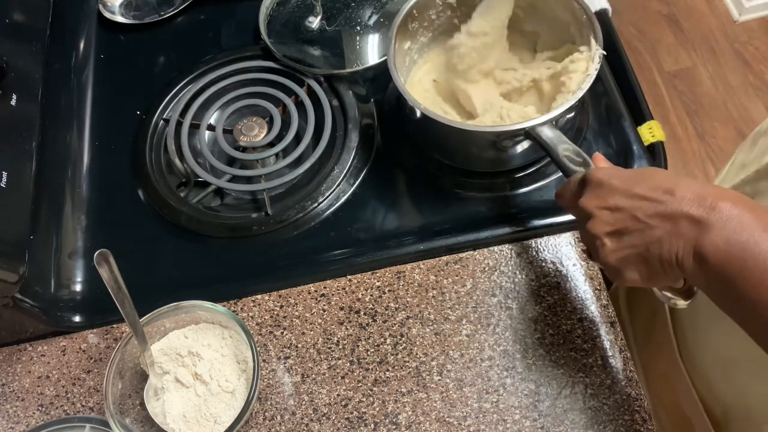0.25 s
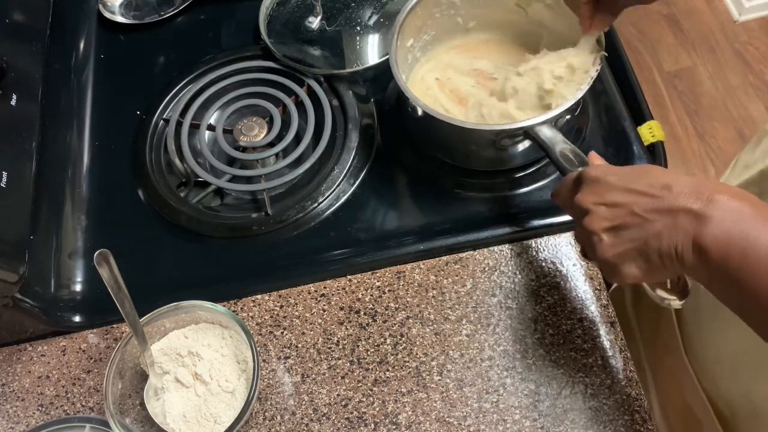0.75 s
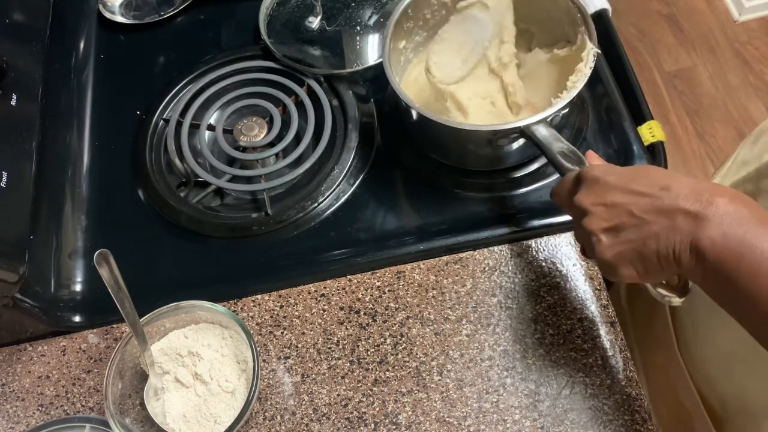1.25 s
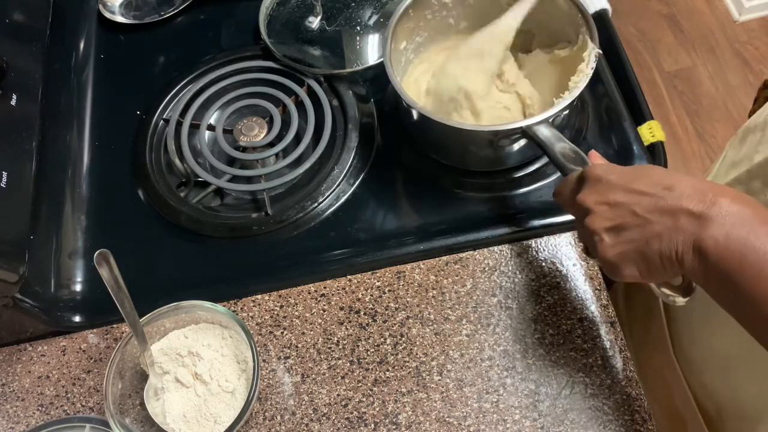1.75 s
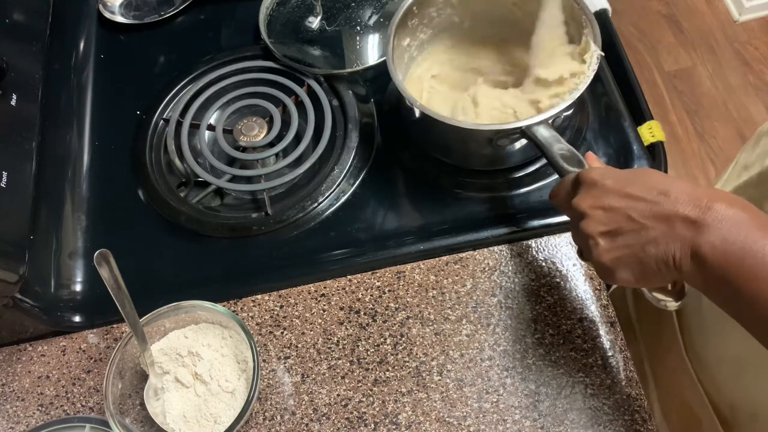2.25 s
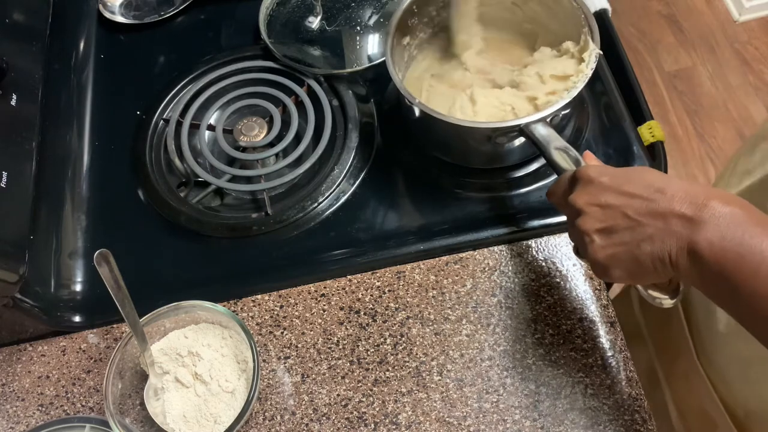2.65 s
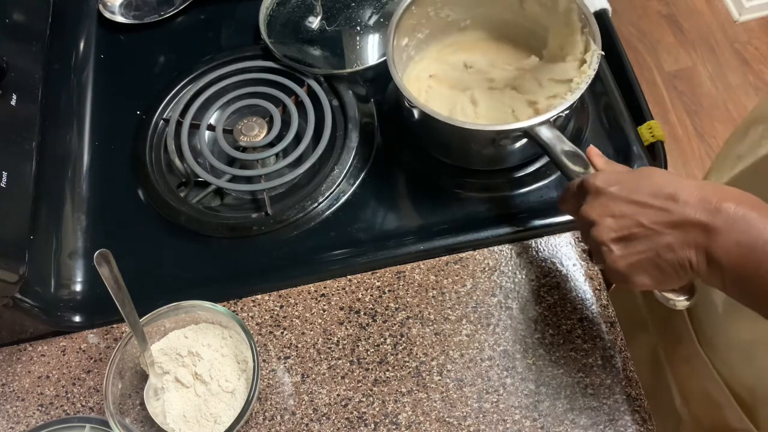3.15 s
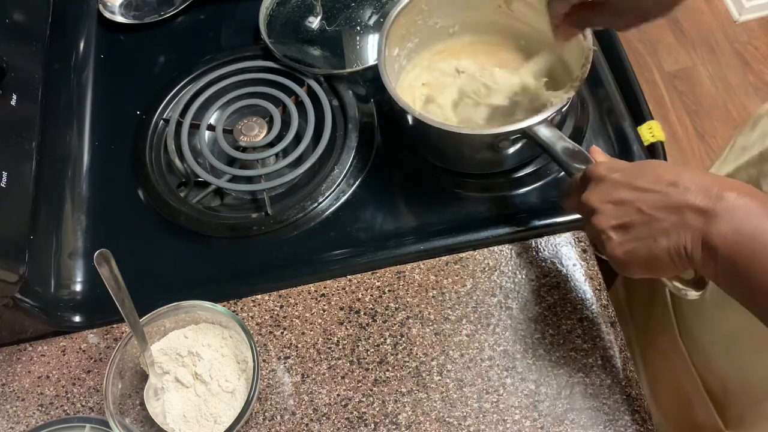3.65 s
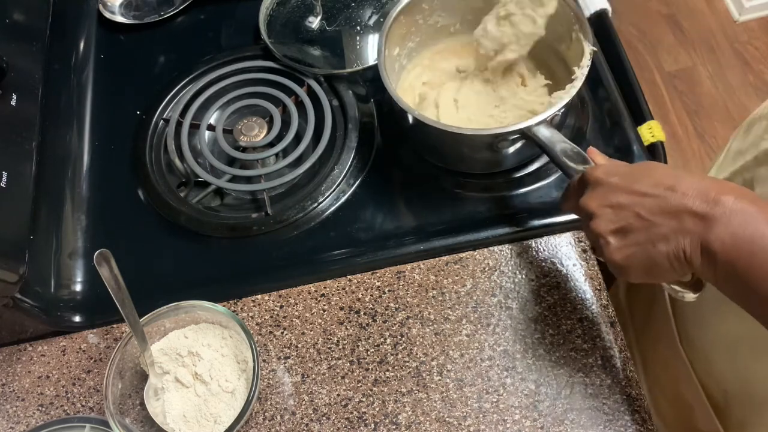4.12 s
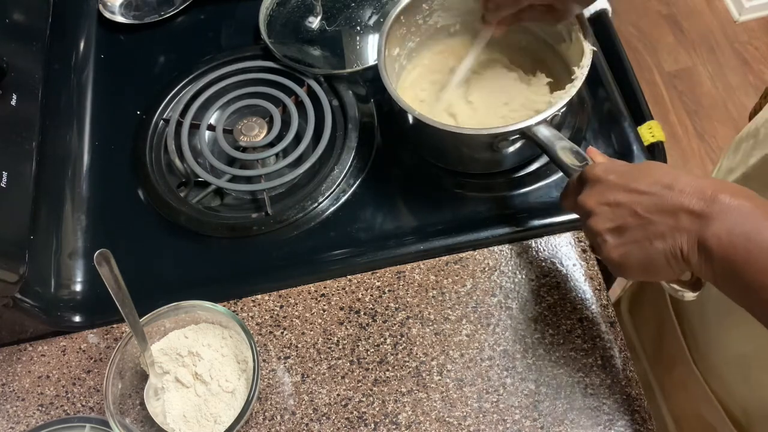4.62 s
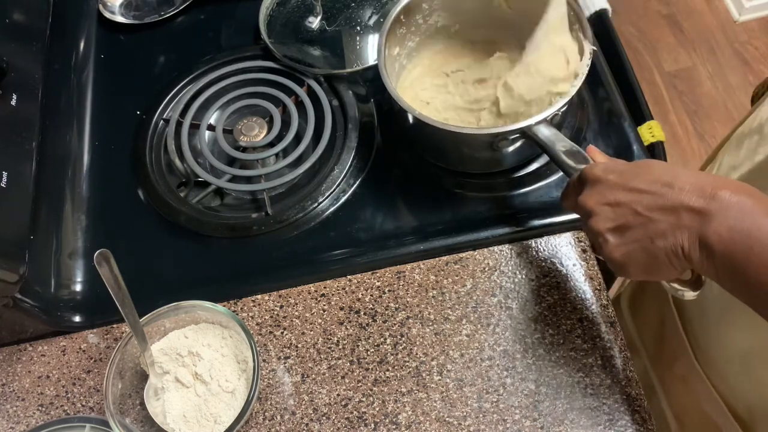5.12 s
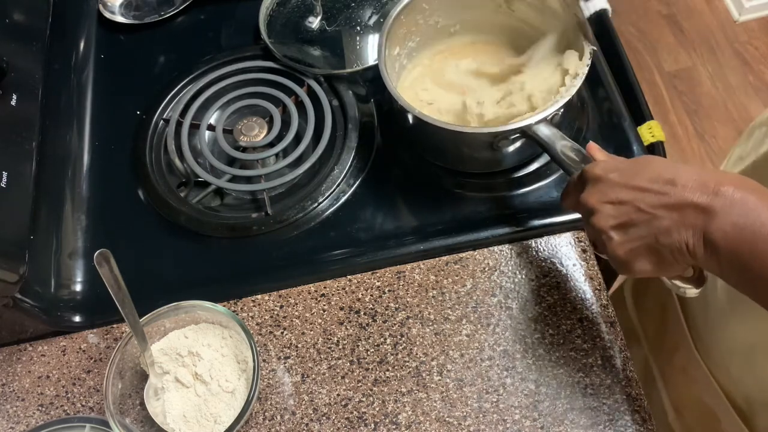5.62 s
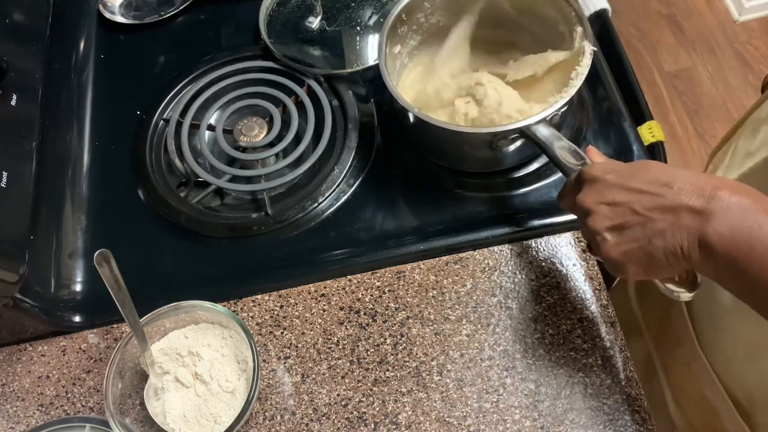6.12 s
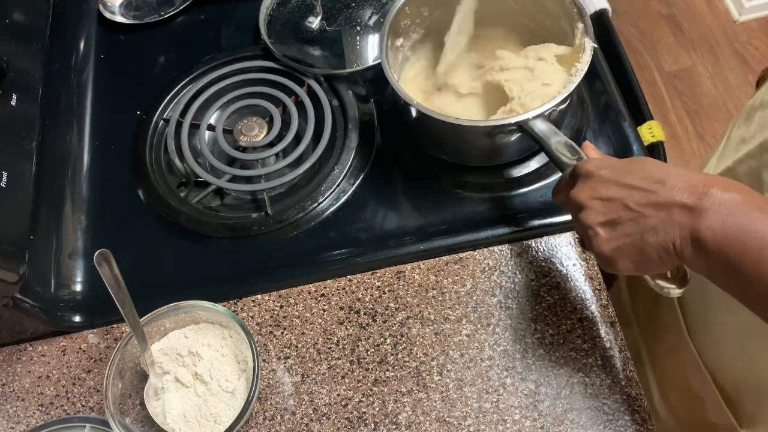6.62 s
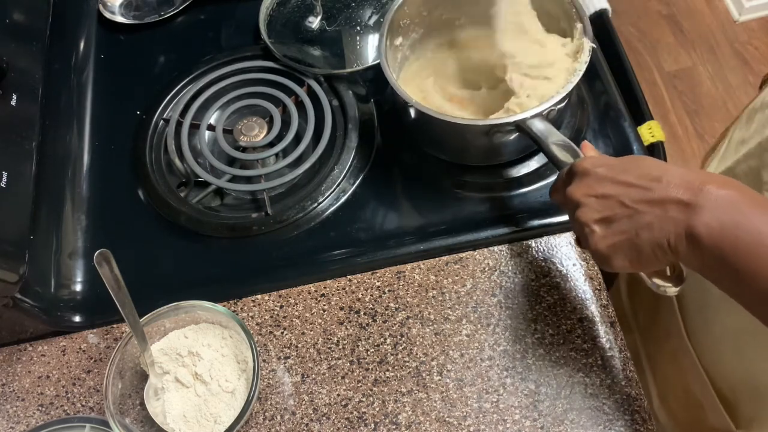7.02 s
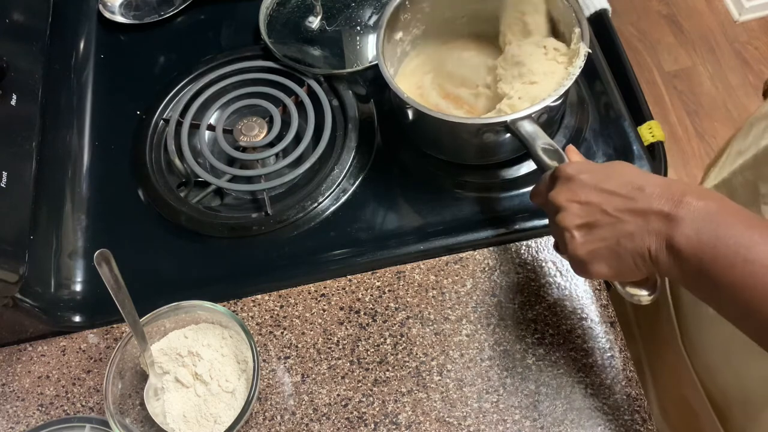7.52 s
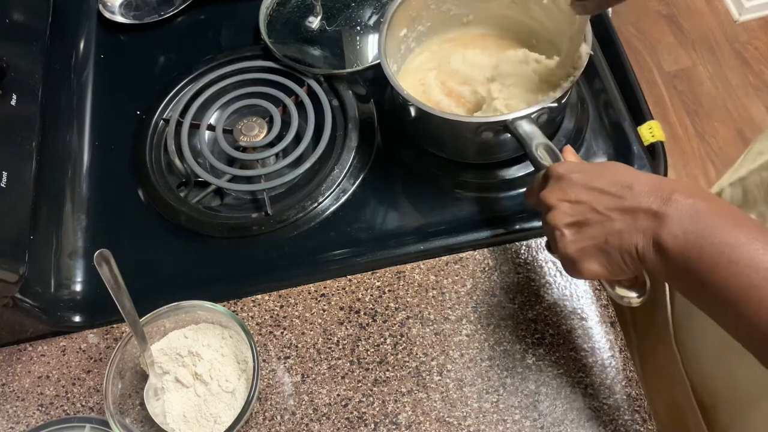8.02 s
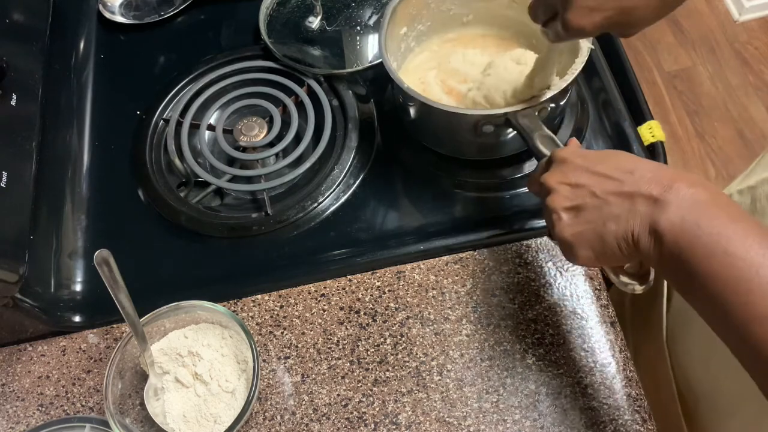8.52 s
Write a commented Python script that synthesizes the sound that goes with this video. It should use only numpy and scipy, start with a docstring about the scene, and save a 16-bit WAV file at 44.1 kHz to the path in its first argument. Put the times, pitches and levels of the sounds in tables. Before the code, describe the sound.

In a small kitchen with a faint low appliance hum, a spoon pushes thick dough round a steel saucepan. Short uneven scrapes mix with sticky crackle and wet smacks, while the pan shifts and thumps on the stove. An early hollow pop, a double knock a little after two seconds and the hardest clanks around six seconds stand out; later stirring is softer. Close stereo microphones with light room echo.

```python
"""Stirring thick dough

A spoon stirs and folds thick dough in a steel saucepan on the coil of an electric stove, heard by two microphones.
Knocks, scrapes and rasps drive the pan's modes and noise washes, and the rubbed pan sings in wavering sines;
dough crackles, smacks and bursts in random snaps and short hollow rings; the pan shifts and groans on the stove top.
A small kitchen echoes it in shaped noise, over a low hum of filtered noise."""
import sys
import numpy as np
from scipy import signal
from scipy.fft import rfft, irfft
from scipy.io import wavfile

SR = 44100
rng = np.random.default_rng(int(sys.argv[2]) if len(sys.argv) > 2 else 0)


def master(y):
    """Save y as 16-bit WAV."""
    cut = np.clip(np.atleast_2d(y).T, -1, 1)
    pcm = np.round(cut * 32767)  # scale
    wavfile.write(sys.argv[1], SR, pcm.astype(np.int16))


N = 386316

# Levels in the tables are relative; the sources trim some of them further.
# pushes of the spoon through the dough: start_s, length_s, scrape level_db, sticky dough level_db, pan shift level_db
STROKES = [(-.02, 0.022, -43.5, -43, -39.5), (0.237, 0.09, -48.5, -46, -43), (0.413, 0.17, -51, -47.5, -50),
           (0.749, 0.03, -39.5, -42, -38.5), (0.93, 0.056, -53, -63, -49), (1.072, 0.18, -80, -62.5, -61),
           (1.332, 0.095, -55, -58, -51.5), (1.51, 0.26, -51.5, -49, -48), (2.015, 0.35, -55, -54.5, -51),
           (2.465, 0.18, -50, -54, -49), (2.603, 0.19, -43.5, -42, -42), (2.886, 0.15, -54, -49.5, -50.5),
           (3.19, 0.06, -51, -48.5, -48), (3.299, 0.17, -43.5, -45.5, -41), (3.64, 0.055, -55, -52.5, -51),
           (3.803, 0.028, -54, -62, -48), (3.94, 0.034, -58.5, -55.5, -75), (4.388, 0.13, -53.5, -61, -53),
           (4.61, 0.13, -59.5, -60.5, -48.5), (5.059, 0.018, -65, -63.5, -46.5),
           (5.388, 0.087, -56, -46.5, -43.5), (5.507, 0.16, -58, -43.5, -54),
           (6.04, 0.19, -51.5, -54, -42.5), (6.303, 0.015, -39, -40, -47), (6.388, 0.03, -49, -48.5, -58),
           (6.7, 0.06, -50, -45, -51), (6.833, 0.092, -51.5, -48.5, -51), (7.059, 0.035, -52, -46, -48),
           (7.235, 0.016, -47, -49.5, -42.5), (7.35, 0.13, -47, -48, -44), (7.571, 0.13, -52, -51, -47),
           (7.8, 0.18, -58.5, -57.5, -48), (8.132, 0.06, -48.5, -53.5, -49),
           (8.215, 0.038, -56, -54.5, -54), (8.322, 0.64, -58, -59, -51), (8.715, .06, -56, -47.5, -46.5)]
# dough peeling off as the spoon lifts: start_s, length_s, level_db
PEELS = [(1.18, 0.026, -61), (1.604, 0.33, -63.5), (2.624, 0.011, -37.5), (4.21, 0.022, -58),
         (4.346, .01, -54), (4.5, 0.0081, -51.5), (7.69, 0.016, -52)]
# spoon against pan: start_s, wall level_db, stove thump level_db, base level_db, tick level_db
KNOCKS = [(0.227, -35.5, -45, -91, -63), (0.7129, -42.5, -62, -44.5, -67), (0.7791, -30.5, -43.5, -57, -69),
          (0.8952, -37.5, -52.5, -69, -53), (1.4352, -43, -64, -61, -66), (1.528, -65, -45, -34, -58),
          (1.541, -28.5, -46, -35, -50.5), (2.169, -31, -39.5, -49, -46),
          (2.2264, -21.5, -39.5, -63, -36.5), (2.2323, -20.5, -41, -50, -44), (2.334, -50, -52, -50, -56),
          (2.4584, -24.5, -43, -45, -40.5), (3.327, -32.5, -51.5, -46, -69),
          (4.3312, -41.5, -53.5, -71, -62), (5.3167, -41.5, -50, -43.5, -57),
          (5.3629, -40.5, -71, -48, -51), (5.6686, -36, -49, -54, -74), (5.7719, -36.5, -47, -34.5, -54),
          (5.9968, -25, -36.5, -26, -36.5), (6.5447, -16, -30, -23.5, -29.5), (6.633, -49, -65, -48, -58),
          (6.6885, -48, -46.5, -55, -64), (6.7925, -34, -49.5, -50, -53), (7.2227, -36.5, -48.5, -35, -60),
          (7.3232, -42, -62, -40, -61), (8.1356, -43, -57, -39.5, -74)]
# dough tearing off the spoon, but at 0.8943 s the sharp click of the spoon on the pan:
# start_s, level_db, length_s, ring pitch_hz
SNAP_RUNS = [(0.446, -53, .02, 890), (0.46, -52, 0.033, 990), (0.528, -55, 0.023, 610),
             (0.619, -56.5, 0.016, 580), (0.731, -55, 0.034, 520), (0.764, -46, 0.036, 915),
             (0.8943, -50, 0.00217, 3700), (1.731, -55, 0.026, 1090), (2.59, -62, 0.018, 1110),
             (2.662, -47, 0.013, 630), (2.684, -47, 0.017, 1115), (2.782, -63, .015, 1470),
             (3.256, -52.5, 0.035, 706), (3.392, -54, 0.016, 1160), (3.476, -55, 0.016, 1220),
             (3.51, -53.5, 0.016, 1100), (3.644, -62, 0.03, 1290), (3.698, -56.5, 0.019, 1120),
             (3.798, -57, 0.013, 1140), (4.283, -58.5, 0.029, 1110), (4.449, -62.5, 0.021, 1130),
             (5.396, -59, 0.016, 1220), (5.439, -51.5, 0.024, 644), (5.535, -57.5, .035, 655),
             (5.633, -58, .025, 1140), (7.432, -57, 0.017, 1210), (7.614, -56, 0.038, 1360),
             (7.977, -63.5, 0.017, 1090)]
# air pockets bursting in the dough: start_s, level_db, pitch_hz, t60_s
POCKETS = [(.7655, -22, 667, 0.051), (4.744, -50.5, 583, 0.025), (5.045, -40, 623, 0.037),
           (5.773, -50, 830, 0.036), (7.256, -42, 746, 0.016), (8.271, -39.5, 604, 0.023),
           (8.547, -49, 620, 0.024), (8.735, -37, 540, 0.015)]
# first the bright edge of the spoon's tick on the pan, then rasps of the spoon on bare steel:
# start_s, length_s, level_db, note of the wall at that spot pitch_hz
BRIGHT_RUBS = [(0.892, .025, -57, 5600), (2.63, 0.029, -55, 3580), (2.707, .08, -62, 4420),
               (3.438, 0.071, -64.5, 4170), (3.641, 0.017, -60.5, 3250), (5.54, 0.041, -60, 2250),
               (6.288, 0.036, -43.5, 3090), (6.38, 0.029, -71, 2200), (6.64, 0.11, -63, 4290),
               (7.33, 0.14, -75, 3600)]
# pan groaning as it is dragged across its coil: time_s, level_db, pitch_hz
GROAN = [(2.50, -70, 155.8), (2.56, -53, 150.4), (2.63, -46.5, 159.6), (2.721, -47, 140.2),
         (2.81, -47, 132), (2.86, -71, 129)]
# sustained notes of the rubbed pan, a low groan of its base, then a thin rim note:
# start_s, length_s, level_db, pitch_hz
RUBBED_NOTES = [(6.175, .065, -55, 670), (6.86, .085, -60.5, 2062)]

# modes of the air in the pan and its dough-damped wall: pitch_hz, level_db, t60_s
PAN_MODES = [(1082, 7, .17), (1145, -2, .1), (1295, -4, .14), (1347, -5, .19), (1545, -9, .09),
             (2062, -4, .19), (2175, -6, .13), (2347, -7, .09), (2750, -7, .05), (3086, -4, .14),
             (3250, -4, .07), (3480, -6.5, .06), (4015, -7, .07), (4353, -7, .13)]
# modes of the pan base on its coil: pitch_hz, level_db, t60_s
BASE_MODES = [(622, 5, .17), (801, 3, .19), (913, 0, .17)]
# modes of the sheet-metal stove top: pitch_hz, level_db, t60_s
STOVE_MODES = [(61.6, -8, .55), (130, -4.5, .19), (166, -1, .17), (211, 2.5, .15), (275, -3, .2),
               (374.4, -10, .16), (411, -4.5, .15)]
# modes of the pan wall where it is scraped bare: pitch_hz, level_db, t60_s
BARE_WALL_MODES = [(1098, -9, .05), (2120, -7, .022), (2370, -4, .02), (3060, 2, .018), (3560, -2, .012),
                   (3960, -4, .016), (4600, -5, .01), (5200, -6, .018), (6185, -9, .018), (7600, -6, .01)]

# dull pan under a scrape, noise spectrum: frequency_hz, level_db (per hertz)
PAN_COLOUR = [(200, -15), (420, 9), (620, 12.5), (900, 10), (1130, 12), (1450, 7), (1750, 4.5), (2150, 3.5),
              (2650, 2.5), (3300, 3), (4800, -5), (7000, -9), (15000, -10)]
# knock on the pan wall, noise spectrum: frequency_hz, level_db (per hertz)
KNOCK_COLOUR = [(200, -18), (450, -2), (1080, 1.5), (1650, -5), (2150, -1), (2750, -5), (3400, -3.5),
                (5000, -9), (7000, -15), (15000, -32)]
# pan base, noise spectrum: frequency_hz, level_db (per hertz)
BASE_COLOUR = [(200, -29), (450, -19.5), (620, -5.5), (900, -10), (1300, -18), (3000, -32)]
# bright tick of a knock, noise spectrum: frequency_hz, level_db (per hertz)
TICK_COLOUR = [(1500, -25), (4000, -5), (5500, -3), (7000, -1.5), (8000, 2), (9800, 2), (11500, -2.5),
               (15500, -8)]
# stove top, noise spectrum: frequency_hz, level_db (per hertz)
STOVE_COLOUR = [(35, -18), (60, -16), (95, -11), (130, -1.5), (165, 0), (205, 0), (270, -1.5), (320, -5),
                (400, -2.5), (560, -11), (900, -17), (2000, -60)]
# sticky dough crackle, noise spectrum: frequency_hz, level_db (per hertz)
DOUGH_COLOUR = [(500, -15), (2000, 6.5), (4500, 1), (6700, 0.5), (8500, 8.5), (10500, 7), (13000, 4),
                (15500, -4.5)]
# smacks and the sharp click, noise spectrum: frequency_hz, level_db (per hertz)
SNAP_COLOUR = [(200, -16), (450, -3), (1100, 0), (1800, -5), (2500, -9), (3300, -8), (5000, -17),
               (15000, -28)]
# kitchen hum, noise spectrum: frequency_hz, level_db (per hertz)
HUM_COLOUR = [(20, -11), (35, -7), (62, 3), (95, -2), (125, -1), (205, -.5), (255, -3.5), (380, -5.5),
              (520, -10), (680, -14), (870, -14), (1100, -16.5), (2100, -25.5), (3200, -34), (6000, -41),
              (15500, -54)]
# different paths round the recorder to its two microphones: frequency_hz, left lead phase_rad
PORT_PHASE = [(550, 0), (850, -.4), (1100, .8), (1400, -.4), (2050, -.6), (3100, -5.6), (4000, -6.2),
              (6600, -5.9), (8700, -9.4), (9800, -12.4), (10400, -12.7), (15500, -21)]

# the spoon takes hold (ramp); the dough relaxes (time constant); a push eases as the dough gives way
ATTACK_S, RELEASE_S, SAG_DB_PER_S = 0.089, 0.063, 13.5
STICK_SLIP_DB, STICK_SLIP_HZ = 2.6, 48
# the spoon never quite rests between pushes
IDLE_SCRAPE_DB, IDLE_DOUGH_DB, IDLE_SHIFT_DB = -88, -74, -55.5
RUB_RING_SHARE = .35  # of their ring time, kept by the wall's modes under the rubbing spoon
# sticky clumps part under the moving spoon: rate, spread of their snaps, ring time, pitch range
CLUMPS_PER_S, CLUMP_S, CLUMP_T60_S, CLUMP_LOW_HZ, CLUMP_HIGH_HZ = 48, .009, .009, 500, 4600
CLUMP_DB, CLUMP_SPREAD_DB, CLUMP_DB_PER_OCTAVE = .5, 2.6, -2.6
WALL_RING_DB, BASE_RING_DB = -3, -4  # against the dense wash of a knock
# the pan rocks back onto its coil: delay after the knock, level against the listed stove thump
SETTLE_S, SETTLE_DB = .018, -7.5
HOLLOW_DB, HOLLOW_T60_S = 5.5, 0.013  # short ring of each snap, in a smack the gap between spoon and dough
SPLAT_DB = -8  # tearing wet skin of a pocket, against its tone
RASP_ATTACK_S, RASP_RELEASE_S = 0.03, 0.0079
# squeak level against the wall; wander of its pitch (share) and flutter of its level as the spoon catches
SQUEAK_DB, SQUEAK_WANDER, SQUEAK_FLUTTER_DB = -6.5, .024, 3.5
NOTE_ATTACK_S, NOTE_RELEASE_S = .015, .025  # notes of the rubbed pan
TOP_HZ = 15500


def undb(db):
    """Decibels to gain."""
    return 10 ** (np.asarray(db) / 20)


def unit(x):
    """Scale to rms 1."""
    return x / np.sqrt(np.mean(x ** 2))


def blow(response):
    """Scale a response to rms 1 over its first fiftieth of a second."""
    return response / np.sqrt(np.mean(response[:SR // 50] ** 2))


def fade(t60, size):
    """Exponential decay over size samples, reaching -60 dB after t60 seconds."""
    return np.exp(-np.log(1000) * np.arange(size) / SR / t60)


def colour(x, points):
    """Causal minimum-phase filter through (Hz, dB) points."""
    hz, db = np.transpose(points)
    size = 8192
    f = np.maximum(np.arange(size // 2 + 1) * SR / size, 1)
    gain = undb(np.interp(np.log(f), np.log(hz), db))
    # folding the cepstrum gathers the response at its start
    cepstrum = irfft(np.log(gain))
    cepstrum[1:size // 2] *= 2
    cepstrum[size // 2 + 1:] = 0
    response = irfft(np.exp(rfft(cepstrum)))
    return signal.oaconvolve(x, response)[:len(x)]


def walk(rate):
    """Random drift through rate new points a second, with a spread near 1."""
    points = rng.standard_normal(int(N / SR * rate) + 2)
    return np.sqrt(3 / 2) * np.interp(np.arange(N) / SR * rate, np.arange(len(points)), points)


def add(track, s, sound):
    """Mix a sound into a track at time s."""
    start = max(int(s * SR), 0)
    track[start:start + len(sound)] += sound[:max(N - start, 0)]


def ring(modes, scatter_db, size=SR // 2):
    """Decaying modes; their shares vary as they would with the place of contact."""
    out = np.zeros(size)
    for hz, db, t60 in modes:
        t = np.arange(min(size, int(t60 * SR) + 2)) / SR
        level = undb(db + scatter_db * rng.standard_normal())
        out[:len(t)] += level * fade(t60, len(t)) * np.sin(2 * np.pi * (hz * t + rng.random()))
    return unit(out)


def crack(points, t60, direct, size=SR // 2):
    """A click with a dense wash of overlapping short modes; direct is the click's share."""
    wash = fade(t60, size) * rng.standard_normal(size)
    click = direct * signal.unit_impulse(size)
    return unit(colour(wash / np.linalg.norm(wash) + click, points))


def grains(rate, spread_db):
    """Tiny slips or snaps at random moments, a few much larger than the rest."""
    chance = rng.random((3, N))
    hit = chance[0] < rate / SR
    size = np.minimum(-np.log(1 - chance[1, hit]), 3.5)
    out = np.zeros(N)
    out[hit] = undb(spread_db * size) * np.sign(chance[2, hit] - .5)
    return unit(out)


def pushes(rows, idle_db, attack_s, release_s):
    """Level in dB of a run of (start s, length s, dB) pushes: each takes hold, eases off and relaxes."""
    power = np.full(N, undb(idle_db) ** 2)
    for s, length, db in rows:
        age = np.arange(max(-attack_s, -s), length + 5 * release_s, 1 / SR)
        hold = (1 + age / attack_s).clip(0, 1) ** 2
        relax = np.exp(-np.maximum(age - length, 0) / release_s)
        push = hold * undb(db - SAG_DB_PER_S * age) * relax
        add(power, s - attack_s, push ** 2)
    return 10 * np.log10(power)


def scrape(db):
    """The spoon sticks and slips on the coated steel and parts clumps; the modes it finds change as it travels."""
    slips = unit(grains(rate=420, spread_db=4.5) * undb(4 * np.tanh(walk(60))))
    dull = unit(colour(slips, PAN_COLOUR))
    angle = 1.5 * walk(10)
    damped = [(hz, level_db, t60 * RUB_RING_SHARE) for hz, level_db, t60 in PAN_MODES]
    # two sets of mode shares trade places as the spoon travels
    steel = np.zeros(N)
    for share in (np.cos(angle), np.sin(angle)):
        steel += share * signal.oaconvolve(slips, ring(damped, scatter_db=1.5, size=SR // 8))[:N]
    mix = undb(-1) * dull + undb(-5) * unit(steel) + undb(CLUMP_DB) * clumps()
    return undb(db - 13.0) * mix


def clumps():
    """Each clump lets go in three quick snaps that ring a small hollow, its pitch sliding as it opens or closes."""
    out, t = np.zeros(N), np.arange(SR // 40) / SR
    for when, height, strength, slide, *gaps in rng.random((int(CLUMPS_PER_S * N / SR), 7)):
        hz = CLUMP_LOW_HZ * (CLUMP_HIGH_HZ / CLUMP_LOW_HZ) ** height
        db = CLUMP_SPREAD_DB * min(-np.log(1 - strength), 3)
        db += CLUMP_DB_PER_OCTAVE * np.log2(hz / CLUMP_LOW_HZ)
        for gap in gaps:
            pitch = hz * (1 + .3 * (slide - .4) * (gap + t / CLUMP_S).clip(0, 2))
            tone = np.sin(2 * np.pi * np.cumsum(pitch) / SR)
            snap = undb(db) * (1 - gap / 2) * fade(CLUMP_T60_S, len(t)) * tone
            add(out, when * N / SR + gap * CLUMP_S, snap)
    return unit(out)


def dough(db):
    """Sticky dough peels from spoon and pan in a fine wet crackle with a few larger snaps."""
    fizz = grains(rate=4000, spread_db=2.2) * undb(2.6 * walk(50))
    snaps = grains(rate=70, spread_db=3)
    return undb(db - 9.5) * unit(colour(fizz + undb(-6.5) * snaps, DOUGH_COLOUR))


def shifting(db):
    """The pan is dragged a little on its coil and the stove top rumbles."""
    judder = grains(rate=500, spread_db=1.5)
    sheet = unit(signal.oaconvolve(judder, ring(STOVE_MODES, scatter_db=5))[:N])
    # the pan rests on several turns of the coil, so a second, independent judder drives the rumble
    rumble = unit(colour(grains(rate=500, spread_db=4.5), STOVE_COLOUR))
    return undb(db - 9.0) * (rumble + undb(-1.0) * sheet)


def stirring():
    """Each push scrapes the pan, crackles the dough and shifts the pan, with a shared stick-slip unevenness."""
    s, length, scrape_db, dough_db, shift_db = np.transpose(STROKES)
    uneven = STICK_SLIP_DB * walk(STICK_SLIP_HZ)
    scrape_level = pushes(zip(s, length, scrape_db), IDLE_SCRAPE_DB, ATTACK_S, RELEASE_S)
    dough_level = pushes([*zip(s, length, dough_db), *PEELS], IDLE_DOUGH_DB, ATTACK_S, RELEASE_S)
    shift_level = pushes(zip(s, length, shift_db), IDLE_SHIFT_DB, ATTACK_S, RELEASE_S)
    return scrape(scrape_level + uneven) + dough(dough_level + uneven) + shifting(shift_level + uneven / 2)


def knocks():
    """Each blow ticks, rings the pan's wall and base and thumps the stove top; the pan settles with a second thump."""
    out = np.zeros(N)
    for s, wall_db, stove_db, base_db, tick_db in KNOCKS:
        wall = crack(KNOCK_COLOUR, t60=.11, direct=.45) + undb(WALL_RING_DB) * ring(PAN_MODES, scatter_db=2)
        base = crack(BASE_COLOUR, t60=.13, direct=.45) + undb(BASE_RING_DB) * ring(BASE_MODES, scatter_db=2)
        tick = crack(TICK_COLOUR, t60=.13, direct=.7)
        add(out, s, undb(wall_db - 14.5) * blow(wall))
        add(out, s, undb(base_db - 12.5) * blow(base))
        add(out, s, undb(tick_db - 0.5) * blow(tick))
        # the sheet metal swells up gradually behind its thump
        sheet = ring(STOVE_MODES, scatter_db=1) * (1 - fade(.05, SR // 2))
        thump, settle = (crack(STOVE_COLOUR, t60=.18, direct=.3) for _ in range(2))
        add(out, s + 0.00314, undb(stove_db + 1.0) * blow(undb(-3.5) * thump + sheet))
        add(out, s + SETTLE_S, undb(stove_db + SETTLE_DB) * blow(settle))
        squeeze = undb(wall_db - 23.5) * contact(KNOCK_COLOUR, soft_s=0.046)
        add(out, s - len(squeeze) / SR, squeeze)
    return out


def contact(points, soft_s):
    """The spoon squeezes out a film of dough, a noise rising in the moment before it meets the steel."""
    size = SR // 50
    return unit(colour(rng.standard_normal(size), points)) * fade(soft_s, size)[::-1]


def smacks_and_click():
    """Quick runs of short ringing snaps: strands of dough part with an opening hollow; one run is a spoon click."""
    out, size = np.zeros(N), SR // 4
    for s, db, length, hz in SNAP_RUNS:
        run = np.zeros(size + SR // 10)
        for k, (when, strength, detune) in enumerate(rng.random((8, 3))):
            hollow = ring([(hz * (.8 + .4 * detune), 0, HOLLOW_T60_S)], scatter_db=0, size=size)
            snap = crack(SNAP_COLOUR, t60=.04, direct=1, size=size) + undb(HOLLOW_DB) * hollow
            # the first snap opens the run at full strength
            start = int(when * np.clip(length, 0, .09) * SR) if k else 0
            run[start:start + size] += (strength ** 2 if k else 1) * snap
        add(out, s, undb(db) * blow(run))
    return out


def pockets():
    """Trapped air breaks out with a wet splat: a cavity rings for a few cycles, sinking as the dough gives."""
    out, t = np.zeros(N), np.arange(SR // 10) / SR
    for s, db, hz, t60 in POCKETS:
        sinking_hz = hz * (1 - 0.1 * (1 - np.exp(-t / 0.009)))
        tone = np.sin(2 * np.pi * np.cumsum(sinking_hz) / SR)
        swell = (1 - np.exp(-t / 0.0012)) ** 2 * fade(t60, len(t))
        tear_colour = [(150, -14), (hz / 2, -2), (hz, 0), (hz * 2, -11), (3000, -28), (15000, -48)]
        tear = unit(colour(rng.standard_normal(len(t)), tear_colour))
        add(out, s, undb(db) * swell / swell.max() * (tone + undb(SPLAT_DB) * tear))
    return out


def tick_edge_and_rasps():
    """Slips rattle the bare wall's modes and squeak around the spot's note: first a tick's bright edge, then rasps."""
    out = np.zeros(N)
    slips = grains(rate=1400, spread_db=2.7) * undb(3 * walk(140))
    travel = np.cumsum(1 + SQUEAK_WANDER * walk(700)) / SR
    catch = undb(SQUEAK_FLUTTER_DB * walk(250))
    for s, length, db, hz in BRIGHT_RUBS:
        wall = unit(signal.oaconvolve(slips, ring(BARE_WALL_MODES, scatter_db=1, size=SR // 10))[:N])
        squeak = unit(catch * np.sin(2 * np.pi * hz * travel))
        level = undb(pushes([(s, length, db)], -140, RASP_ATTACK_S, RASP_RELEASE_S))
        out += level * (wall + undb(SQUEAK_DB) * squeak)
    return out


def groan():
    """The dragged pan judders on its coil at a wavering rate."""
    s, db, hz = np.transpose(GROAN)
    t = np.arange(N) / SR
    wavering_hz = np.interp(t, s, hz) * (1 + .12 * walk(90))
    phase = 2 * np.pi * np.cumsum(wavering_hz) / SR
    tone = unit(np.sin(phase) + 0.12 * np.sin(2 * phase))
    level_db = np.interp(t, s, db, left=-np.inf, right=-np.inf) + 5.4 * walk(50)
    return undb(level_db) * tone


def rubbed_notes():
    """The rubbed pan sustains slightly wavering notes: a low groan of its base, then a thin rim note."""
    out, t = np.zeros(N), np.arange(N) / SR
    for s, length, db, hz in RUBBED_NOTES:
        end = s + length
        swell = np.interp(t, [s - NOTE_ATTACK_S, s, end, end + NOTE_RELEASE_S], [0, 1, .6, 0])
        level = undb(db + 1.5 * walk(30))
        note = unit(np.sin(2 * np.pi * np.cumsum(hz + 16 * walk(70)) / SR))
        out += level * swell * note
    return out


def kitchen(x, spill, size=SR):
    """Both microphones hear the pan directly; sideways spill returns from stove back and cupboards, then the room."""
    onset = 1 - np.exp(-(np.arange(size) / SR / 0.0065) ** 2)
    # a short decay for the near surfaces, a long one for the room
    envelope = unit(onset * (unit(fade(0.044, size)) + undb(-1.5) * unit(fade(0.39, size))))
    walls = [(60, -8), (300, -4.5), (550, -4.5), (800, -2), (1150, -2), (1900, 0), (4000, 0), (9000, -4), (15000, -6)]
    washes = (colour(envelope * rng.standard_normal(size), walls) for _ in range(2))
    echo = diffuse(*washes) / np.sqrt(size)
    lead = np.interp(np.arange(N // 2 + 1) * SR / N, *np.transpose(PORT_PHASE))
    left = irfft(rfft(x) * np.exp(1j * lead), N)
    return np.array([left, x]) + undb(3.0) * signal.oaconvolve(spill[None], echo, axes=1)[:, :N]


def diffuse(left, right):
    """Sound from all sides: alike at both microphones in the bass, unrelated in the treble."""
    size = len(left)
    likeness = .94 * np.sinc(np.arange(size // 2 + 1) * SR / size / 1150)
    mid = irfft(rfft(left) * np.sqrt(1 + likeness), size)
    side = irfft(rfft(right) * np.sqrt(1 - likeness), size)
    return np.array([mid + side, mid - side]) / np.sqrt(2)


def hum():
    """The low rush of kitchen appliances: filtered noise from all sides, its level wavering gently."""
    air = diffuse(*(unit(colour(rng.standard_normal(N), HUM_COLOUR)) for _ in range(2)))
    return undb(-54.5) * undb(1.4 * walk(5.7)) * air


def scene():
    """Strokes, knocks, smacks, rubbed notes and air pockets in the humming kitchen."""
    pan = stirring() + tick_edge_and_rasps() + groan() + knocks() + smacks_and_click()
    # less of the pockets and the rubbed notes reaches the walls
    upward = pockets() + rubbed_notes()
    return kitchen(pan + upward, pan + undb(-7.0) * upward) + hum()


def record(dry):
    """The left microphone is a little stronger in the middle range; the recorder cuts the top."""
    left = colour(dry[0], [(150, 0.84), (500, 1.47), (1000, 1.3), (2200, 3.5), (5000, -0.23)])
    low_pass = signal.ellip(10, .2, 80, TOP_HZ, fs=SR, output="sos")
    return signal.sosfilt(low_pass, np.array([left, dry[1]]))


dry = scene()
out = record(dry)
master(out)
```